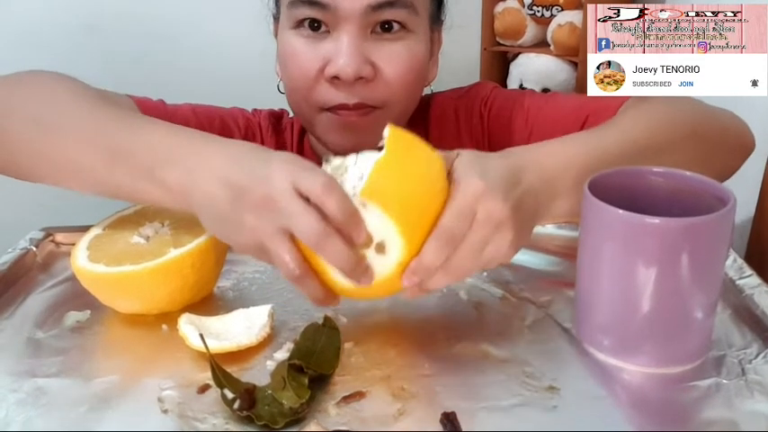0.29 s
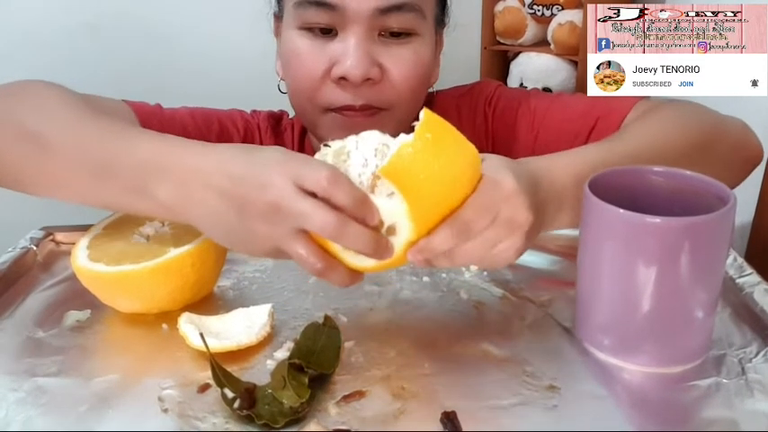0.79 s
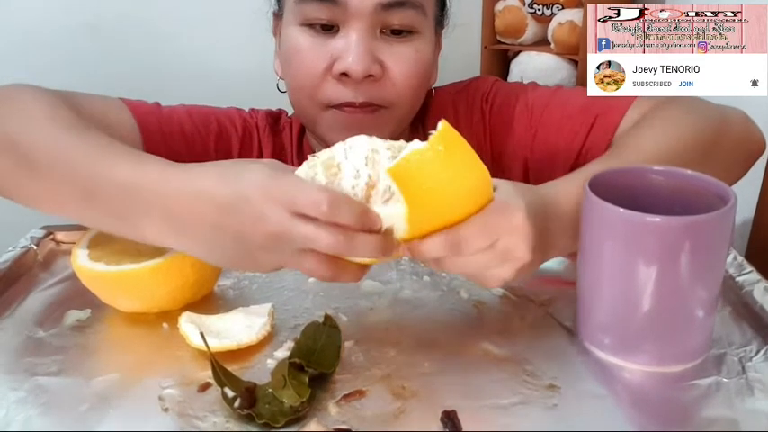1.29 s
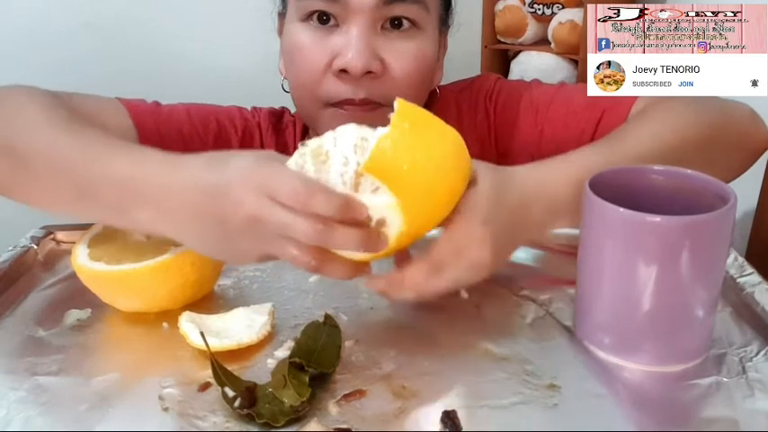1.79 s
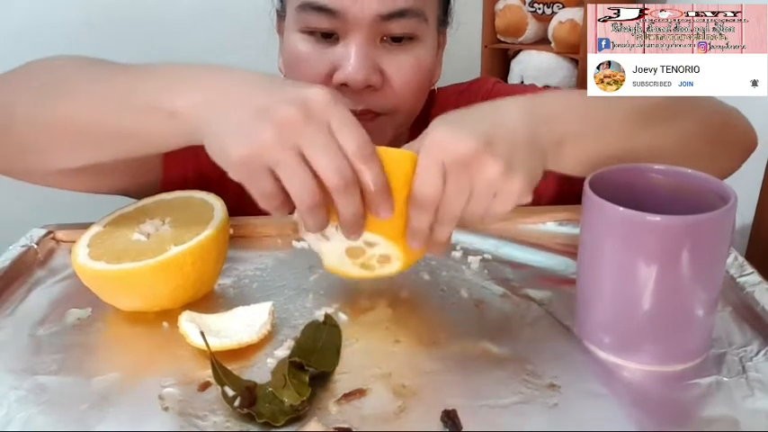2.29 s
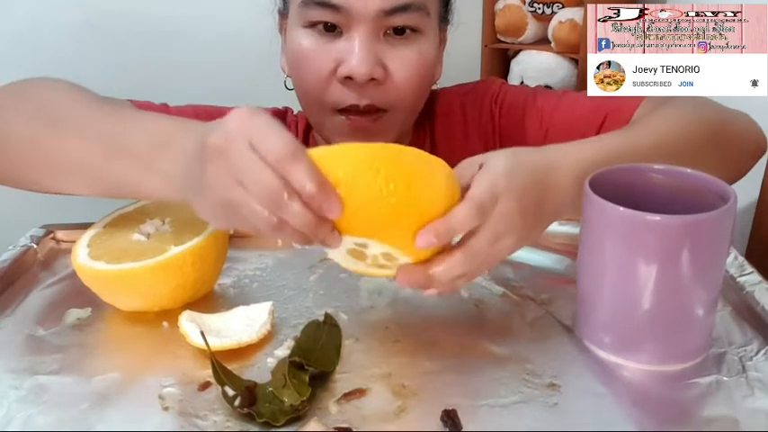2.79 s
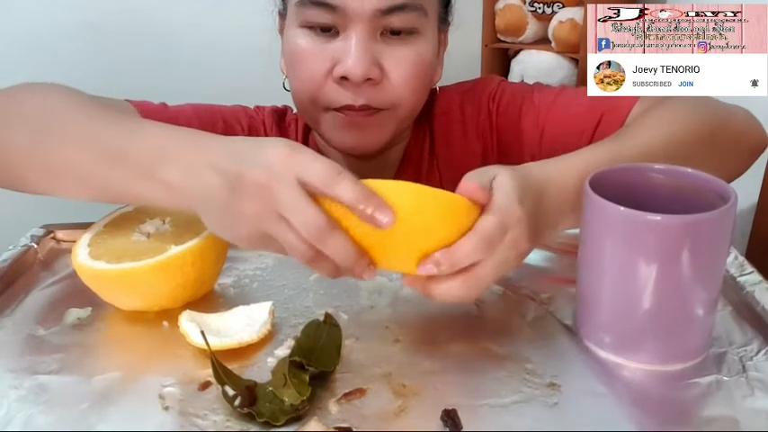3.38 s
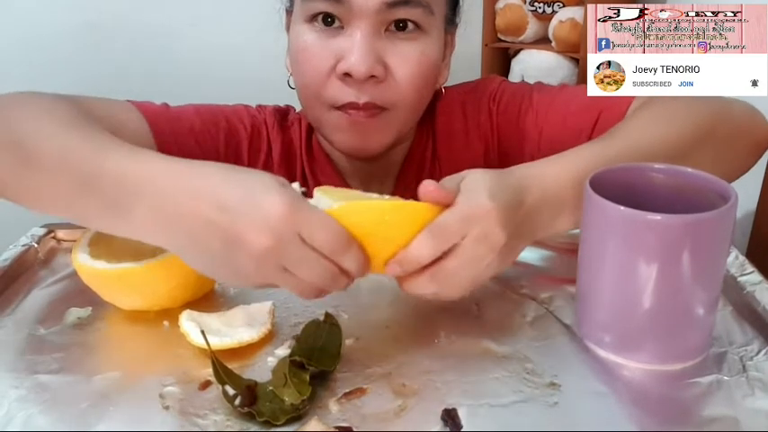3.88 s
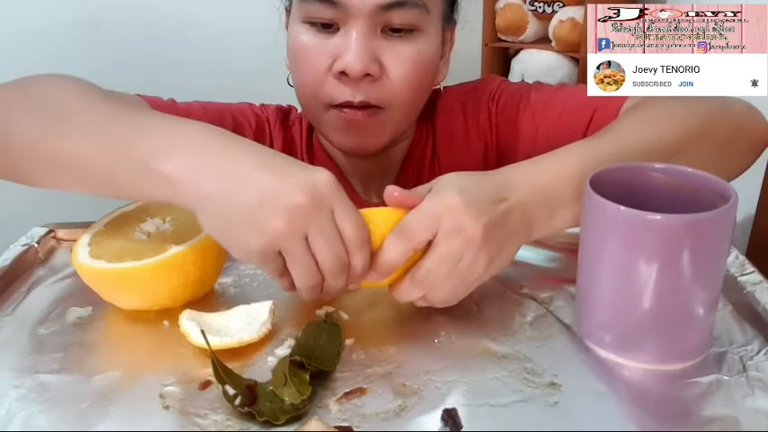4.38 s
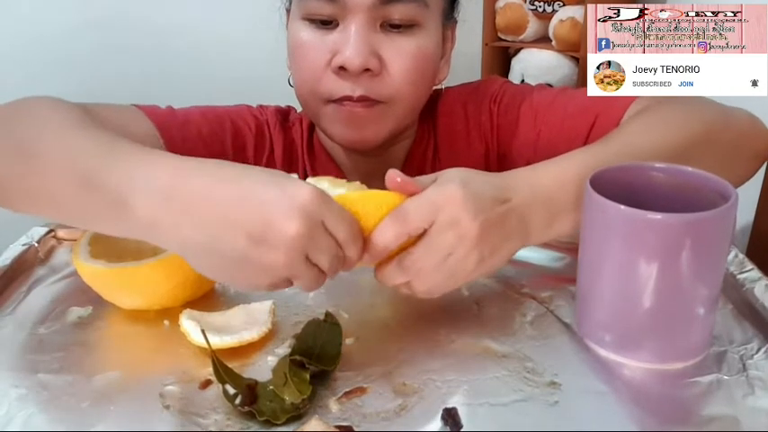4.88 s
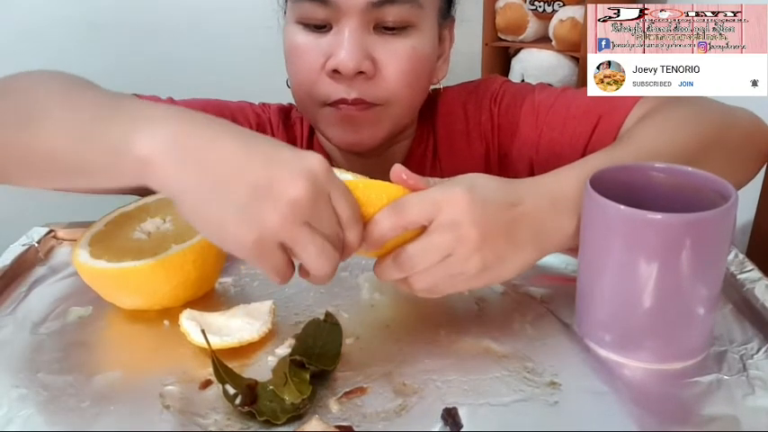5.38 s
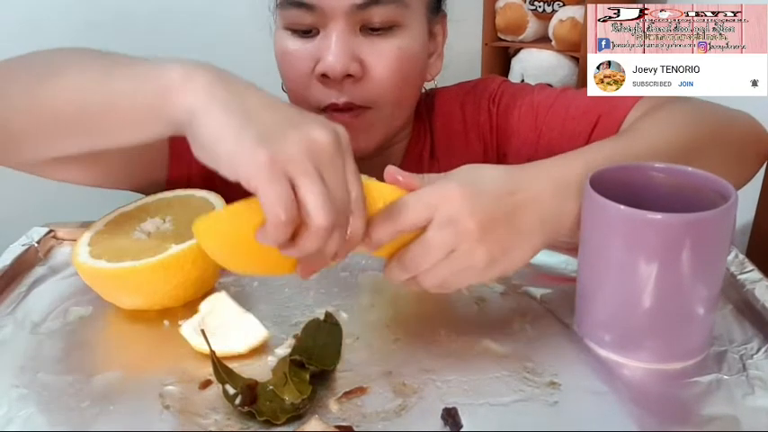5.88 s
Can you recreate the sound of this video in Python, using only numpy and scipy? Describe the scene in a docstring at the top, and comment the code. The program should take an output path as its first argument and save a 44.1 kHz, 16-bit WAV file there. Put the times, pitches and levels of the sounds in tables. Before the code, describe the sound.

Thick fruit peel and pith tear in soft crackles and sharp snaps, interrupted by a single hollow thud on a foil-lined tray.

```python
"""A light bump on a foil-lined tray, then a fine crackle: hands are peeling a large citrus fruit.
Under tension the pith fibres fracture, singly in ticks and in runs as dense rips, and each single snap
opens an air pocket under the thick peel, which pops at its cavity resonance. Skin rasps on the rind by
stick-slip friction. The fruit strikes the tray once hard and several times lightly, exciting its modes.
All is heard close by, in stereo, in a small room with a faint rumble and hiss."""
import sys
import numpy as np
from scipy import signal
from scipy.fft import rfft, irfft
from scipy.io import wavfile

SR = 44100
rng = np.random.default_rng(int(sys.argv[2]) if len(sys.argv) > 2 else 0)


def inscribe(sig):
    """Save sig as 16-bit PCM at rate SR to the path in sys.argv[1].

    A 1-D sig is mono; a 2-D sig holds one channel per row.
    Samples are clipped to [-1, 1] before scaling.
    """
    pcm = np.round(np.clip(np.atleast_2d(sig).T, -1, 1) * 32767)
    wavfile.write(sys.argv[1], SR, pcm.astype(np.int16))


N = 269892

# fruit and hands striking the tray: (time [s], level [dB], favoured frequency [Hz], spread [octaves])
TRAY_IMPACTS = [(0.001, -37.5, 275, 0.41), (0.02, -46, 70, 0.52), (0.83, -49, 173, 0.98),
                (1.062, -50, 146, 1.35), (2.1451, -20, 220, 2), (2.154, -13, 216, 2.2),
                (2.359, -50, 548, 0.46), (5.662, -47, 85, 0.79), (5.719, -54, 110, 0.84),
                (5.774, -55, 130, 0.57), (5.849, -61, 140, 0.72)]
# modes of the tray on its table: (frequency [Hz], 60 dB decay time [s], relative level [dB])
TRAY_MODES = [(57, .5, -2), (75.6, 0.39, -16), (105, .1, -.5), (125, 0.25, -9.5), (140.5, 0.2067, -13),
              (172, 0.064, -2.5), (247, .15, -12.5), (328, 0.091, -6.5), (365, 0.052, -11.5),
              (417, .1, -14), (509.2, 0.084, -4), (650, .07, -15), (790, .065, -9.5), (964, 0.13, -22.5),
              (1247, 0.053, -30)]
# slow pulls on the peel: (time [s], duration [s], crackle level at mid-pull [dB])
PEEL_PULLS = [(0.381, .48, -51.5), (0.953, 0.35, -48.5), (1.342, .39, -51.5), (3.78, 0.24, -54),
              (4.351, 0.1, -56), (4.547, 0.614, -58), (5.313, 0.36, -49.5), (5.88, 0.39, -58.5)]
# single fibres snapping, each opening an air pocket: (time [s], tick level [dB], pop level [dB])
FIBRE_SNAPS = [(0.434, -37, -40), (0.502, -32, -45), (0.569, -32.5, -34.5), (0.642, -33, -40.5),
               (0.708, -34, -35.5), (0.749, -33, -28), (0.7584, -31, -33.5), (0.836, -39, -30.5),
               (0.854, -39, -23.5), (0.9915, -44, -43), (1.037, -34, -35.5), (1.101, -36, -39.5),
               (1.133, -34, -26), (1.209, -34, -62), (1.2262, -37, -24), (1.2977, -30, -33),
               (1.452, -35, -42.5), (3.5661, -20, -30), (3.5847, -38, -29), (4.0215, -34, -33.5),
               (4.311, -47, -38.5), (4.368, -33.5, -30.5), (4.431, -35, -36), (4.4513, -35, -34.5),
               (4.513, -31.5, -61), (4.5235, -30.5, -31), (4.575, -36.5, -66), (4.695, -36, -38),
               (4.849, -41, -53.5), (4.9685, -43, -23), (5.593, -39, -38), (5.6153, -27, -20),
               (5.655, -33, -16.5), (5.675, -25, -33), (5.9613, -44, -41.5)]
# resonance of the hollow under the peel, lower the further it is lifted: (time [s], frequency [Hz])
CAVITY_PITCH = [(0.43, 2900), (0.75, 2400), (0.86, 2060), (1.22, 2020), (1.45, 2550), (4.7, 2560),
                (4.96, 4000)]
# runs of breaking fibres: (time [s], duration [s], level [dB], relative level of thick pith [dB])
FIBRE_RUNS = [(1.318, 0.0085, -31.5, -17), (1.5422, 0.0097, -14.5, -26), (1.697, 0.014, -39, -16),
              (3.424, .005, -39, -8), (3.4365, 0.021, -21.5, -13), (3.5192, .01, -32.5, 1),
              (3.566, 0.029, -25.5, -5), (3.603, .05, -22.5, -2.5), (3.655, 0.041, -26, -14),
              (3.6718, 0.029, -15.5, -12), (3.9083, 0.0044, -25.5, -35), (3.988, 0.0087, -33, -19),
              (4.221, 0.059, -38.5, -12), (4.268, 0.03, -34.5, -14.5), (4.873, 0.016, -49.5, -0.5),
              (4.9373, 0.0051, -21, -22), (4.976, 0.0097, -18.5, -16), (5.112, 0.0017, -34, -25),
              (5.129, 0.016, -40.5, -10.5), (5.247, .006, -44, -5.5), (5.272, .02, -45.5, -10),
              (5.359, 0.0093, -38.5, -8.5), (5.392, 0.015, -39, -10.5), (5.449, 0.0069, -28.5, -15.5),
              (5.513, 0.0047, -36.5, -10.5), (5.622, 0.037, -41, -1), (5.653, 0.022, -38.5, 0),
              (6.1, .007, -42, -25)]
# skin sliding on the rind: (time [s], duration [s], level [dB])
SKIN_STROKES = [(1.97, .15, -63.5), (2.137, 0.084, -49.5), (2.619, .13, -43.5), (3.125, 0.072, -54),
                (3.349, 0.12, -51.5), (4.161, .035, -56), (5.881, 0.054, -50.5), (5.985, 0.054, -50.5)]
# spectral envelopes: (frequency [Hz], relative level [dB])
FOIL_SPECTRUM = [(60, -35), (200, -0.5), (400, -0.5), (800, -4.5), (1400, -7.5), (2200, -10.5),
                 (3500, -15.5), (7000, -10), (15000, -31)]
CRACKLE_SPECTRUM = [(300, -23), (1000, -11.5), (1500, -20.5), (2500, -8.5), (3600, -10.5), (4500, 1),
                    (5400, -6), (7200, 1.5), (9200, -4.5), (12000, -2), (15500, -5.5)]
FIBRE_SPECTRUM = [(300, -44), (1000, -35), (2000, -34.5), (2900, -3.5), (3600, -10), (4400, 0.5), (5600, 2),
                  (7500, 6), (9200, -1), (11500, 2.5), (15500, -4.5)]
PITH_SPECTRUM = [(60, -16.5), (140, -3), (230, -12.5), (420, -4.5), (600, -4.5), (800, 1), (1050, -2),
                 (1700, -3), (2300, -4), (3000, 0), (4200, 5), (7000, -1), (15000, -33.5)]
SKIN_SPECTRUM = [(500, -31), (2000, -29), (3300, -18.5), (4400, -7), (7000, -1), (10000, -8), (12000, -4),
                 (15500, -14)]
ECHO_SPECTRUM = [(60, -6), (300, -7.5), (800, 0.5), (2200, 2.5), (5000, -1), (9000, -1.5), (15000, -2.5)]
BACKGROUND_SPECTRUM = [(12, -41), (20, -16), (59, -2.5), (129, -13.5), (342, -17.5), (439, -20),
                       (519, -18.5), (1500, -23.5), (1630, -24), (3350, -25.5), (5090, -29), (6910, -22),
                       (15500, -26.5)]


def undb(db):
    """Amplitude ratio of a level in decibels."""
    return 10 ** (np.asarray(db) / 20)


def unit(x):
    """Normalisation to an rms of one."""
    return x / np.sqrt(np.mean(x ** 2) + 1e-18)


def gains(spectrum, size):
    """Magnitude response on the bins of a transform, interpolated in log frequency."""
    hz, db = np.transpose(spectrum)
    return undb(np.interp(np.log(np.fft.rfftfreq(size, 1 / SR) + 1), np.log(hz), db))


def colour(x, spectrum, size=2048):
    """Minimum-phase filtering to a spectral envelope; white input keeps its power."""
    cepstrum = irfft(np.log(gains(spectrum, size)))
    cepstrum[1:size // 2] *= 2
    cepstrum[size // 2 + 1:] = 0
    response = irfft(np.exp(rfft(cepstrum)))
    return signal.fftconvolve(x, response[None] / np.linalg.norm(response), axes=1)[:, :x.shape[1]]


def add(out, start, sound):
    """Superposition of a sound from a start time in seconds."""
    i = max(int(start * SR), 0)
    out[:, i:i + sound.shape[-1]] += sound[..., :max(N - i, 0)]


def stereo_noise(size, split_hz):
    """Diffuse-field noise: two channels are coherent in the bass and independent in the treble."""
    mid, side = rfft(rng.standard_normal((2, size)))
    coherence = .96 / (1 + (np.fft.rfftfreq(size, 1 / SR) / split_hz) ** 2)
    mid, side = mid * np.sqrt((1 + coherence) / 2), side * np.sqrt((1 - coherence) / 2)
    return irfft(np.array([mid + side, mid - side]), size)


def fractures(size, per_s, spread_db, lag_s=.00022, scatter_s=.0002):
    """Acoustic emission: tiny breaks send out random impulses, each with its own path difference."""
    count = int(per_s * size / SR) + 2
    at = rng.integers(0, size, count)
    strength = rng.choice([-1, 1], count) * undb(spread_db * np.minimum(rng.exponential(size=count), 4))
    lag = np.round(SR * (lag_s + scatter_s * rng.standard_normal(count))).astype(int)
    return unit(np.array([np.bincount(i % size, strength, size) for i in (at, at + lag)]))


def contact_db(hz, centre_hz, octaves):
    """Selective excitation: the place and softness of a contact favour one band of frequencies."""
    return -4.3 * np.minimum((np.log2(hz / centre_hz) / octaves) ** 2, 9)


def tray_bumps(slap_s=0.015, squash_s=0.00053):
    """Impact excitation: a blow rings the tray's damped modes and slaps its foil."""
    out, t = np.zeros((2, N)), np.arange(SR // 2) / SR
    push = 1 - np.exp(-t / squash_s)  # the soft fruit squashes before it pushes fully
    for start, db, centre_hz, octaves in TRAY_IMPACTS:
        ring = np.zeros(len(t))
        for hz, t60, mode_db in TRAY_MODES:
            amplitude = undb(mode_db + contact_db(hz, centre_hz, octaves))
            ring += amplitude * np.exp(-np.log(1000) * t / t60) * np.sin(2 * np.pi * hz * t)
        spectrum = [(hz, level + contact_db(hz, centre_hz, octaves)) for hz, level in FOIL_SPECTRUM]
        slap = colour(stereo_noise(len(t), split_hz=1400) * np.exp(-t / slap_s), spectrum)
        add(out, start, undb(db) * push * (undb(-0.5) * ring + undb(-13) * slap))
    out *= undb([[-0.75], [0.75]])  # slightly to the right
    # the bumps carry nothing below about 50 Hz
    return signal.sosfilt(signal.butter(4, 52, "high", fs=SR, output="sos"), out)


def pull_crackle(attack_s=0.031, release_s=0.062, build_db=7.5):
    """Microfracture under load: fine fibres crackle louder as tension builds, until the hand lets go."""
    tension = np.zeros(N)
    for start, length, db in PEEL_PULLS:
        t = np.maximum(np.arange(N) / SR - start, 0)
        build = undb(db + build_db * (np.minimum(t / length, 1) - 0.5))
        release = np.exp(-np.maximum(t - length, 0) / release_s)
        tension += build * (1 - np.exp(-t / attack_s)) * release
    return colour(tension * fractures(N, per_s=1300, spread_db=3.5), CRACKLE_SPECTRUM)


def fibre_ticks(decay_s=0.0016):
    """Brittle fracture: one fibre snaps and releases its strain as a brief, bright crack."""
    out, t = np.zeros((2, N)), np.arange(SR // 100) / SR
    for start, db, _ in FIBRE_SNAPS:
        add(out, start, undb(db) * np.exp(-t / decay_s) * fractures(len(t), per_s=27000, spread_db=-5.5))
    return colour(out, [(300, -27), (1200, -12), (3000, -1.5), (7000, 7), (9500, 1.5), (15500, -3)])


def pocket_pops(swell_s=0.00053, lag_s=.00008, creak_s=0.15, cavity_decay_s=0.0025, reference_hz=2000):
    """Cavity resonance: an air pocket opens with a few strong cycles; tiny breaks ring it as a creak."""
    out = np.zeros((2, N))
    t = np.maximum(np.arange(SR // 50) / SR - np.array([[0], [lag_s]]), 0)
    strain = np.hanning(int(creak_s * SR))
    for start, _, db in FIBRE_SNAPS:
        hz = np.interp(start, *np.transpose(CAVITY_PITCH))
        tone = np.sin(2 * np.pi * hz * t)
        age = t / swell_s * hz / reference_hz  # smaller, higher pockets are spent sooner
        # the surrounding flap of peel flexes about an octave lower
        flap = undb(-15.5) * np.exp(-t / 0.0011) * np.cos(2 * np.pi * hz * 0.48 * t)
        add(out, start, undb(db) * (age * np.exp(1 - age) * tone + flap))
        breaks = strain * fractures(len(strain), per_s=400, spread_db=6.5)
        creak = signal.fftconvolve(breaks, np.exp(-t / cavity_decay_s) * tone, axes=1)
        # the creak varies less in level than the pop and is faint around small pockets
        creak_db = -55 + 0.57 * db - 16 * np.log2(hz / reference_hz)
        add(out, start - creak_s / 3, undb(creak_db) * creak)
    return signal.sosfilt(signal.butter(2, 600, "high", fs=SR, output="sos"), out)


def peel_rips(attack_s=0.00045, fibre_release_s=0.0032, pith_release_s=0.015, sag_db=3.5):
    """Cascading fracture: a run of fibres spends the tension; thick pith crunches lower and longer."""
    fibre, pith = np.zeros((2, 2, N))
    t = np.arange(SR // 5) / SR
    for start, length, db, pith_db in FIBRE_RUNS:
        after = np.maximum(t - length, 0)
        strength = undb(db - sag_db * np.minimum(t / length, 1)) * (1 - np.exp(-t / attack_s))
        fibre_envelope = strength * np.exp(-after / fibre_release_s)
        add(fibre, start, fibre_envelope * fractures(len(t), per_s=5500, spread_db=0.5))
        pith_envelope = strength * np.exp(-after / pith_release_s) * undb(pith_db)
        crunch = pith_envelope * fractures(len(t), per_s=1500, spread_db=2.5)
        # the more pith gives way at once, the deeper its crunch reaches: an octave per 6 dB
        low_hz = np.clip(800 * 2 ** ((-41.5 - db - pith_db) / 6), 90, 750)
        add(pith, start, signal.sosfilt(signal.butter(4, low_hz, "high", fs=SR, output="sos"), crunch))
    return colour(fibre, FIBRE_SPECTRUM) + colour(pith, PITH_SPECTRUM)


def skin_rubs():
    """Stick-slip friction: fingers catch on the rind and slide off with a dense rasp."""
    out = np.zeros((2, N))
    for start, length, db in SKIN_STROKES:
        along = np.linspace(0, 1, int(length * SR))
        stroke = np.sqrt(np.maximum(np.sin(np.pi * along ** 0.8), 0))
        add(out, start, undb(db) * stroke * fractures(len(stroke), per_s=6000, spread_db=4))
    return colour(out, SKIN_SPECTRUM)


def room(dry, t60_s=0.26, early_s=0.011, onset_s=0.0027):
    """Reverberation: the tray and near walls reflect first, then the small room decays exponentially."""
    t = np.arange(SR // 2) / SR
    early_boost = 1 + 0.66 * np.exp(-t / early_s)
    envelope = np.exp(-np.log(1000) * t / t60_s) * early_boost * (1 - np.exp(-t / onset_s))
    echo = stereo_noise(len(t), split_hz=150) * envelope / np.linalg.norm(envelope)
    echo = colour(echo, ECHO_SPECTRUM) * np.sqrt(np.mean(gains(ECHO_SPECTRUM, len(t)) ** 2))
    return dry + undb(-1) * signal.fftconvolve(dry, echo, axes=1)[:, :N]


def scene():
    """Superposition: all the handling sounds in the room, over a faint, steady rumble and hiss."""
    background = undb(-63) * unit(colour(stereo_noise(N, split_hz=150), BACKGROUND_SPECTRUM, size=8192))
    handling = tray_bumps() + pull_crackle() + fibre_ticks() + pocket_pops() + peel_rips() + skin_rubs()
    return room(handling) + background


def record(dry):
    """Band limiting: a steep low-pass filter removes the treble above 15.5 kHz."""
    return signal.sosfilt(signal.ellip(10, .2, 80, 15500, fs=SR, output="sos"), dry)


dry = scene()
out = record(dry)
inscribe(out)
```